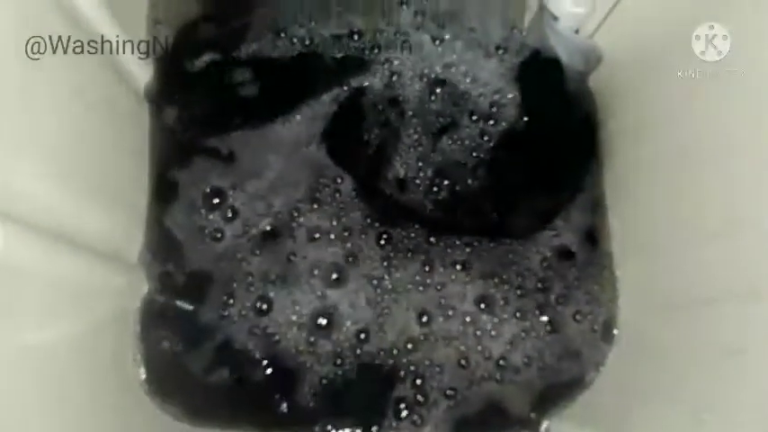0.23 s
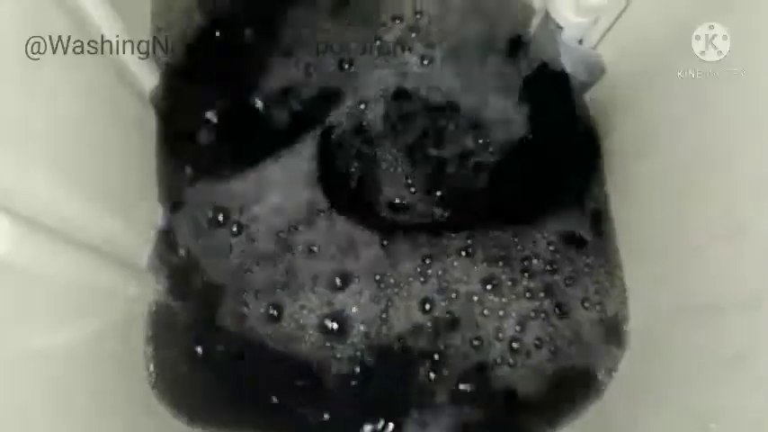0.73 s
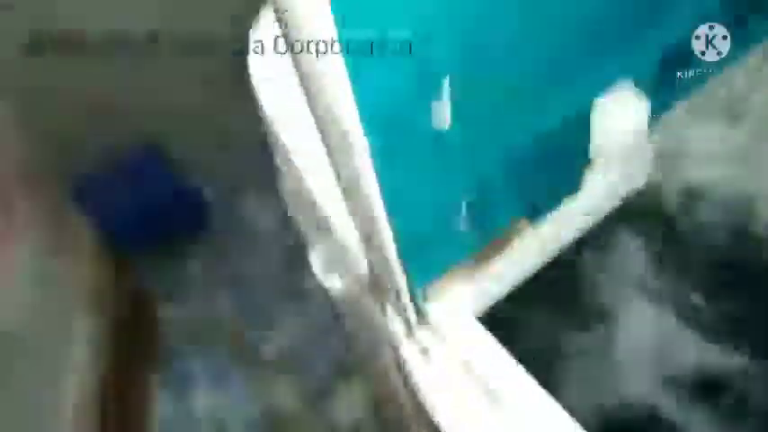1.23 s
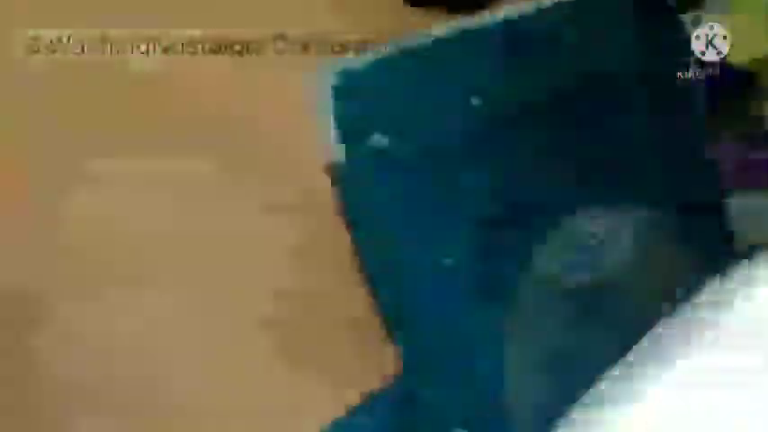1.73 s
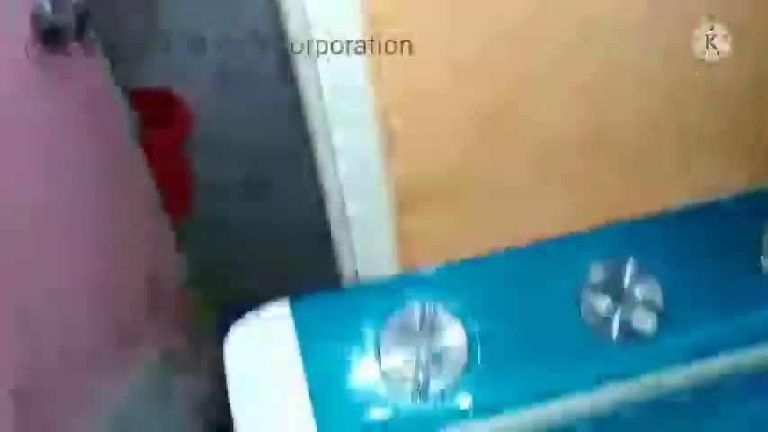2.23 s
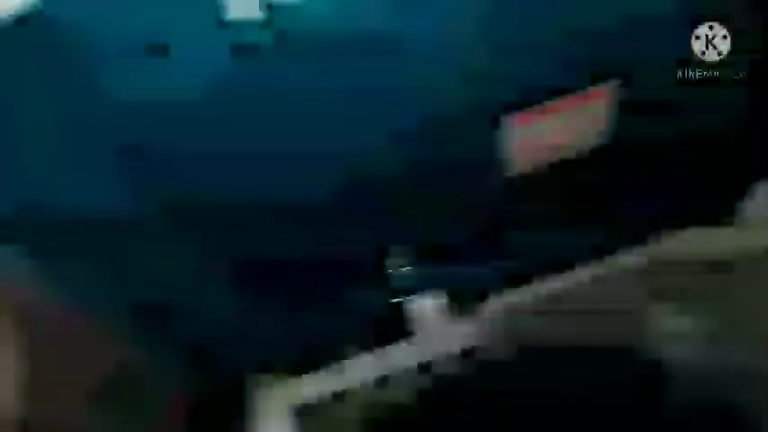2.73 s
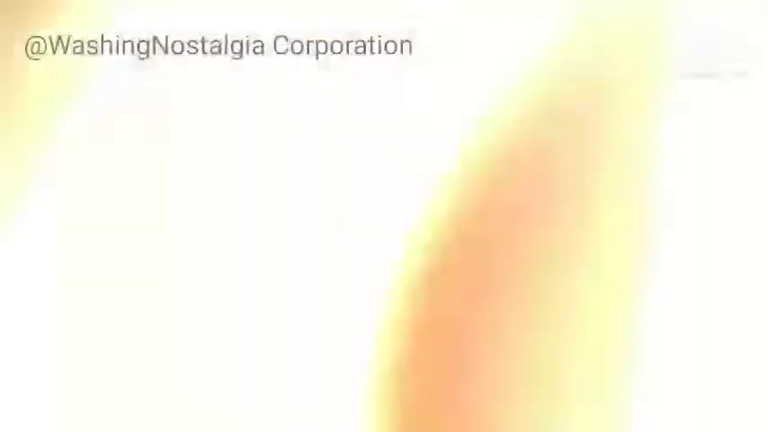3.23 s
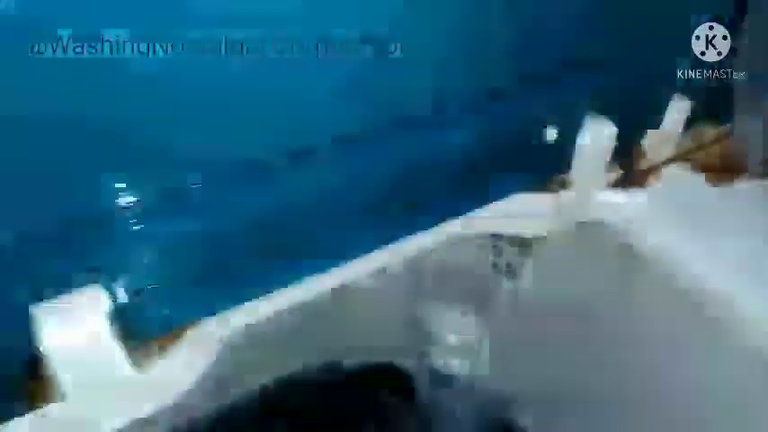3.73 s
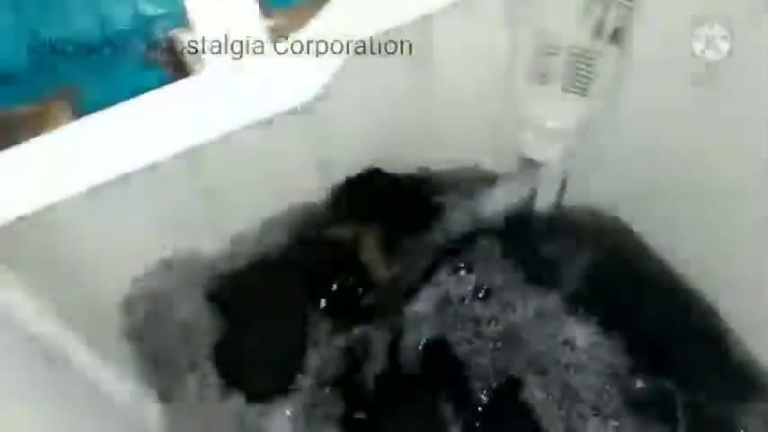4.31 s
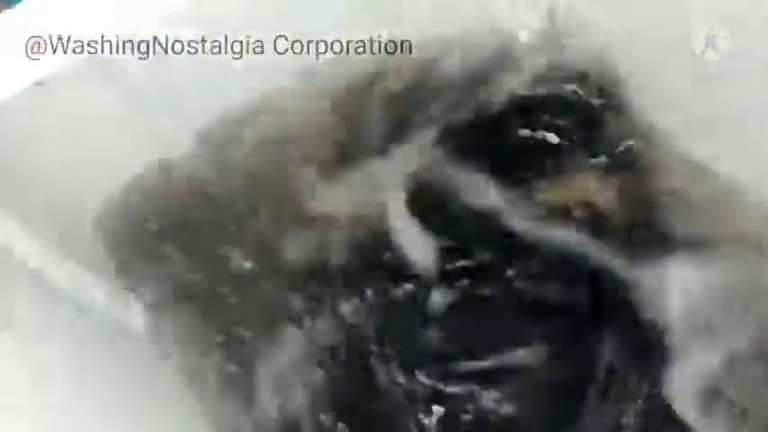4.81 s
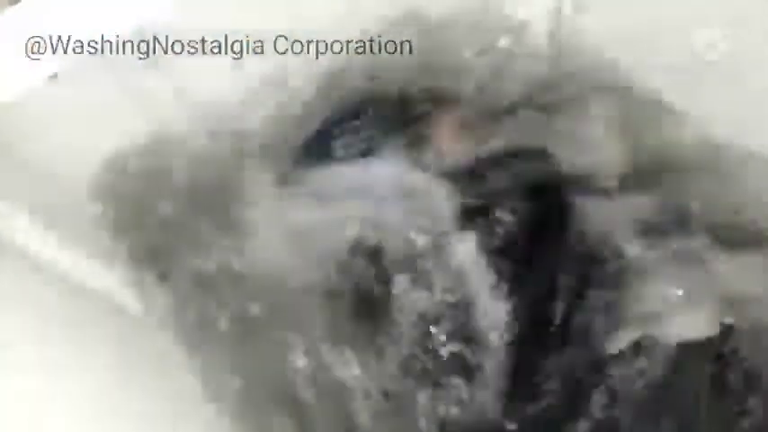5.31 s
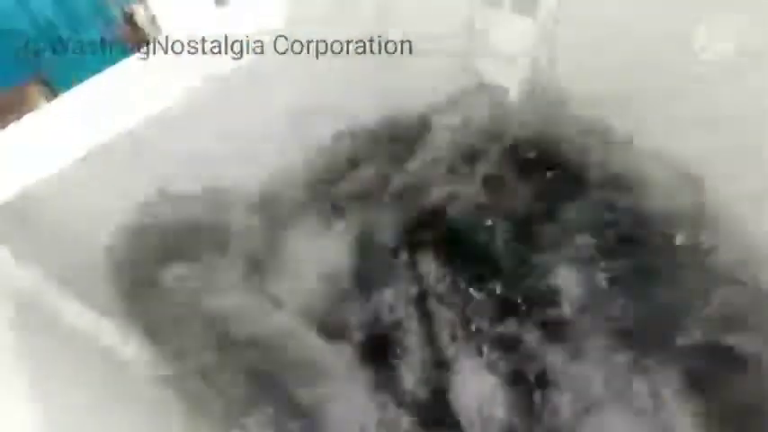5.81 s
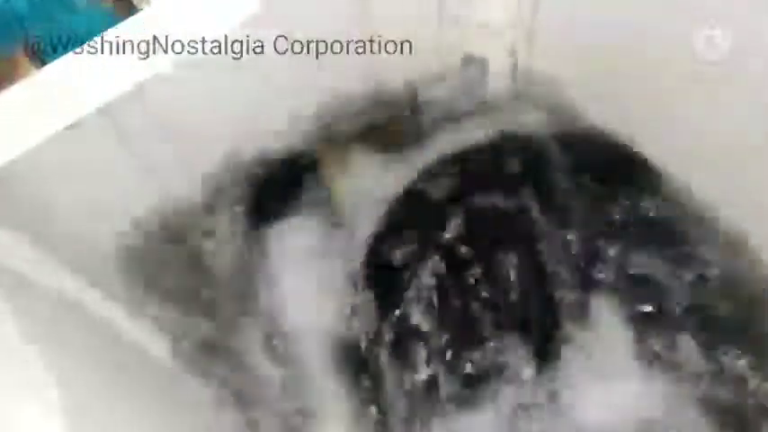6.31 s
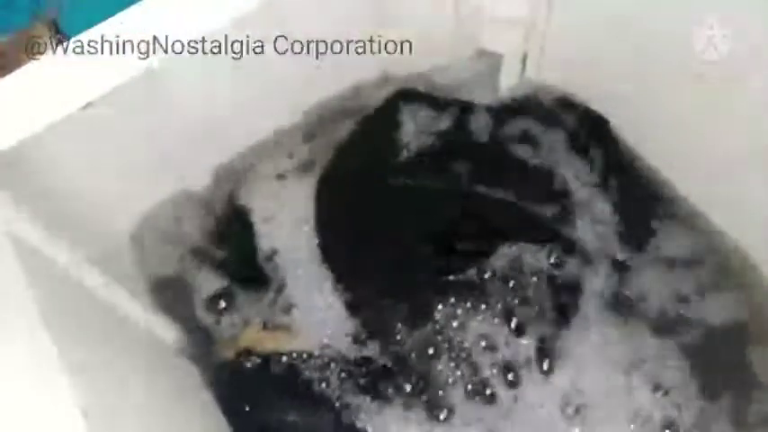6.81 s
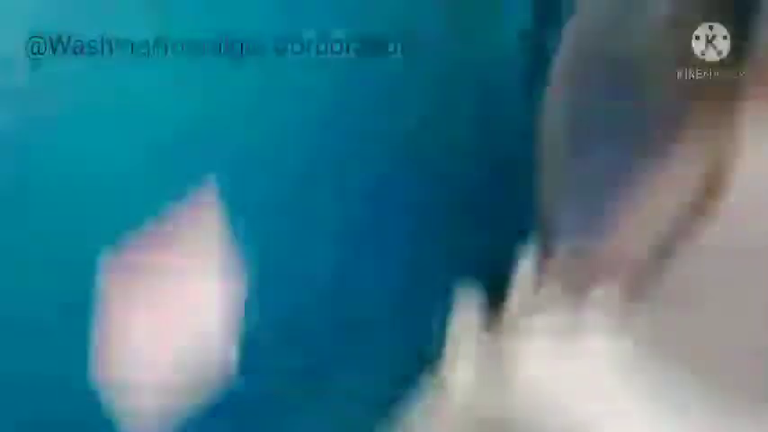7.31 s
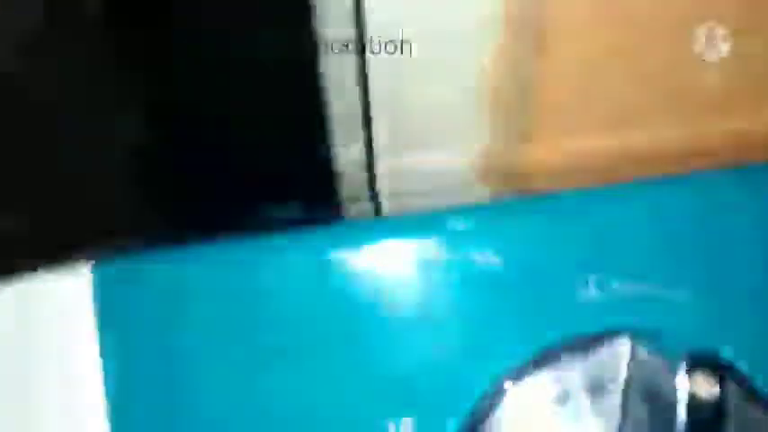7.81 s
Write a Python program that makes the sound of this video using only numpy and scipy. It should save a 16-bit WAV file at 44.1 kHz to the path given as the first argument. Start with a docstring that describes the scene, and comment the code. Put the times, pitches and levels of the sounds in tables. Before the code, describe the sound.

A washing machine twice snaps on, hums and churns sloshing water, while its clockwork timer rattles quickly throughout.

```python
"""Water churns in a twin-tub washer, twice: a flickering rush full of bubbles slaps the tub wall, then settles
into gurgles and drips. Each run opens with a switch snap and a straining motor hum over rumble and grind.
A clockwork timer rattles throughout, its escapement ringing the case. The hand-held microphone moves
around the machine in a quiet room, and fingers brush its two ports now and then."""
import sys
import numpy as np
from scipy import signal
from scipy.fft import rfft, irfft
from scipy.io import wavfile
from scipy.ndimage import uniform_filter1d

SR = 44100
rng = np.random.default_rng(int(sys.argv[2]) if len(sys.argv) > 2 else 0)


def materialize(psi):
    """Save the field psi as 16-bit PCM at rate SR to the path in sys.argv[1].

    A 1-D psi becomes a single channel; in a 2-D psi each row is a channel.
    """
    bounded = np.clip(np.atleast_2d(psi).T, -1, 1)
    quanta = np.round(bounded * 32767).astype(np.int16)
    wavfile.write(sys.argv[1], SR, quanta)


N = 355446
LAG = 6  # samples by which the left port hears the tub later
CREST = 3  # peak over rms of a noise burst

# Colour of the rushing water: (frequency [Hz], density [dB])
RUSH_SPECTRUM = [(25, -36), (59, -32), (100, -28), (160, -19.5), (283, -6.5), (322, -5.5), (398, -9),
                 (595, -17.5), (970, -8.5), (4020, -3), (7450, -14), (12900, -10.5), (16000, -15)]
# Swells of the water, one list a churn:
# (time [s], rush [dB], gurgle against rush [dB], spray against rush [dB], left-right [dB])
CHURNS = [
    [(0.79, -75, -6, -12, 1.5), (0.804, -35.5, -14, -6, 1), (0.814, -37, 1, -8, 1),
     (0.876, -34.5, -10.5, -1, 3), (0.898, -34, -7.5, -11, 1), (0.93, -32.5, -6.5, -4, 3),
     (0.944, -37.5, -1, -4, -2.5), (0.952, -36, -1.5, -9, 0), (0.958, -49, 0, 1.5, -5.5),
     (0.97, -48, -4.5, 5, -1.5), (0.978, -35, -7, -6.5, -4), (0.992, -41, 6.5, -0.5, 8),
     (1.0, -36, -21.5, -5.5, -5), (1.016, -38, -2, 0.5, 4), (1.032, -33.5, -8.5, -6.5, 0),
     (1.05, -41, 0, 5.5, 6), (1.062, -38, -7.5, 7, -2), (1.078, -43.5, -6, 2.5, 9),
     (1.088, -33, -12, -1, 0), (1.168, -45.5, 2.5, -2, 0), (1.204, -34.5, -26, -15.5, 10),
     (1.232, -36.5, -6, -2.5, 2), (1.242, -36.5, 3, -1.5, 3), (1.286, -33, -8, -6.5, -0.5),
     (1.314, -36.5, -1.5, -9, 0), (1.368, -50, -10, -3.5, 4.0), (1.386, -49.5, -6.5, -2, 1),
     (1.398, -34, -13.5, -4, 2), (1.41, -42, -6, -8.5, 9), (1.425, -37.5, -15.5, -8.5, 3),
     (1.446, -46, 1, 0, 6), (1.474, -39, -14.5, -7, 0), (1.496, -48.5, -2, -4, 2),
     (1.546, -41.5, -9.5, -4, 0.5), (1.57, -51.5, -1.5, -0.5, 5), (1.592, -48.5, -11, 0.5, -2),
     (1.634, -66, 6.5, -3, 5), (1.66, -68, 6.5, 3, 3.5)],
    [(4.37, -50, -6.5, -3.5, 0), (4.4, -65, 7, -6.5, 3), (4.41, -44.5, -13, -5.5, -4),
     (4.426, -35, -1.5, 6, 2), (4.458, -55, 5.5, -6, -1), (4.488, -32, -15, 1, 1.5),
     (4.504, -52, -2, -2.5, -3.5), (4.582, -37.5, -9, 1.5, 3), (4.592, -44.5, 2.5, -4.5, -2),
     (4.638, -42.5, -10, -4, 0), (4.654, -49, -13, -11, 6), (4.67, -45, -12, -5, 7),
     (4.7, -39, -5.5, 0.5, -2.5), (4.762, -39.5, -4, 2.5, -0.5), (4.82, -35, -7, -6.5, -2),
     (4.845, -31, -12, -8.5, -2.5), (4.882, -31.5, -9, -9, 0), (4.898, -37, -20, -6, -2),
     (4.97, -34, -4, -4, 0.5), (5.266, -35, -8.5, -4.5, -0.5), (5.286, -29.5, -27, -9.5, -2),
     (5.358, -38, -2, -4.5, -1), (5.374, -36, -3.5, 1, 1.5), (5.39, -36, -6.5, -0.5, 2),
     (5.504, -34.5, -4.5, -3.5, 0), (5.68, -37, -8, -2, 1.0), (5.7, -32.5, -3, -5.5, 0),
     (5.758, -38.5, -10.5, -3.5, -1.5), (5.794, -35, -6, -2.5, -1), (5.96, -35.5, -5, -2.5, 0.5),
     (5.996, -42.5, -18.5, 0, 0), (6.016, -37.5, -0.5, -5.5, 3), (6.042, -35, -12, -6, 0),
     (6.074, -44, -7.5, -5.5, 1), (6.11, -40, -6.5, 3.5, 6), (6.126, -35.5, -17, 6, 3),
     (6.152, -50, -16.5, 2, -4), (6.172, -48, 1, -4.5, 10), (6.182, -45, -8, -2.5, -6),
     (6.192, -42.5, -8.5, -20, 11), (6.208, -59, -1, 1, 6), (6.23, -63, -8, -1, 0)],
]


def water():
    """Churning water: a patchy rush with bubbles in the gurgle, fizz and spray above."""
    usual_gurgle_db, usual_spray_db = -10.5, -5
    hz, frame_t = grid(size=512)
    rush_db, gurgle_db, spray_db, pan_db = follow(settling_churns(), frame_t)
    drift_db = [.75 * wander(len(frame_t), span=9) for _ in range(2)]
    gurgle_db = gurgle_db - usual_gurgle_db + drift_db[0]
    spray_db = spray_db - usual_spray_db + drift_db[1]
    tilt = np.clip((1600 - hz) / 600, 0, 1) * gurgle_db + np.clip((hz - 6000) / 2000, 0, 1) * spray_db
    gusts = 1.28 * evened(uniform_filter1d(rng.exponential(1, len(frame_t)) - 1, 3))  # flurries of drops
    hollows = 3.6 * patches(size=512, bins=2, frames=8)  # brief resonances of air pockets
    mottle = 2.47 * patches(size=512, bins=14, frames=5)
    rush = gain_of(3) * noise(spectrum(RUSH_SPECTRUM, hz) + tilt + mottle + hollows + gusts, 512, .051)
    t = np.arange(N) / SR
    rush_db, gurgle_db, spray_db, pan_db = (
        np.interp(t, frame_t, curve) for curve in (rush_db, gurgle_db, spray_db, pan_db))
    gurgle = bubbles(597.8, 2318, per_s=160, cycles=15.5, spread_db=3.55, glide=.045)
    fizz = bubbles(1488, 5980, per_s=320, cycles=12, spread_db=2.5)
    spray = bubbles(4600, 19000, per_s=600, cycles=2.9, spread_db=5.5)
    mix = rush + gain_of(gurgle_db / 2 - 17) * gurgle + gain_of(-11) * fizz
    mix += gain_of(spray_db - 16.5) * spray
    gate = churning(t, fade_s=.0071)
    mid_rms = np.sqrt(np.sum(gate * band(mix.mean(0), 1200, 7000) ** 2) / np.sum(gate))
    return gate * gain_of(rush_db) * sides(pan_db) * mix / mid_rms


def settling_churns(tail_s=.43, drop_db=21):
    """Each churn with a tail in which the rush dies away."""
    return [rows + [(rows[-1][0] + tail_s, rows[-1][1] - drop_db, *rows[-1][2:])] for rows in CHURNS]


def churning(t, fade_s):
    """Gate that is open during each churn and its tail."""
    return sum(np.clip(np.minimum(t - rows[0][0], rows[-1][0] - t) / fade_s, 0, 1)
               for rows in settling_churns())


def bubbles(lo_hz, hi_hz, per_s, cycles, spread_db, glide=.013):
    """Bubbles in moving water ring as short rising tones, a few much louder than the rest."""
    out = np.zeros((2, N + 8000))
    draws = rng.random((int(per_s * N / SR), 4))
    for place, pitch, rank, side in draws[churning(draws[:, 0] * N / SR, fade_s=.01) > 0]:
        hz = lo_hz * (hi_hz / lo_hz) ** pitch
        age = np.arange(int(4 * cycles / hz * SR)) / SR * hz / cycles
        tone = np.sin(2 * np.pi * cycles * (age + glide * age ** 2))
        envelope = age ** .17 * np.exp(-2 * age)
        strength = np.sqrt(hz) * gain_of(-spread_db * np.log(rank + .02))
        add(out, place * N / SR, np.sqrt([[side], [1 - side]]) * strength * envelope * tone)
    return evened(np.array([np.roll(out[0], LAG), out[1]])[:, :N])


# Water slapping the tub wall, and small knocks in the quiet:
# (time [s], level [dB], brightness [dB], t60 [s], left-right [dB], ring [Hz])
TUB_SLAPS = [(0.7277, -29, -6, 0.079, -3.5, 600), (0.8066, -32, -10, 0.056, -6, 1500),
             (0.8989, -22.5, -7, 0.041, -5, 3530), (0.914, -21, 2, 0.026, 2, 3320),
             (0.9584, -20.5, 14, 0.012, 6, 5090), (0.9981, -32, 1, 0.044, 4, 3120),
             (1.1967, -14, -4.5, 0.04, -1.5, 2600), (1.206, -20, -4, 0.026, -6, 4240),
             (1.258, -20, -7, 0.03, 7, 2300), (1.3962, -23.5, 2, 0.056, 9, 2450),
             (1.4177, -19.5, -4, 0.061, 3, 2040), (1.4594, -36, 18, 0.15, 0, 1110),
             (1.8327, -38, -4, 0.028, 11, 1500), (1.8904, -42, -15.5, 0.08, 11, 2040),
             (1.945, -40, -20.5, 0.046, 13.5, 2160), (2.0614, -46.5, -12, 0.069, 15, 1800),
             (2.19, -55.5, -20, 0.072, 5, 1800), (3.7135, -44.5, -20, 0.061, -7, 1110),
             (3.7309, -28.5, -13.5, 0.064, -1, 1500), (4.4218, -47, 10, 0.042, -6, 1040),
             (4.4832, -26, 12, 0.019, 3, 2450), (4.5516, -36, -1, 0.034, 0, 3120),
             (4.575, -18.5, -4, 0.026, -3, 6500), (4.6503, -17.5, -7, 0.047, -7.5, 2040),
             (4.711, -23, 12, 0.035, 2, 1170), (4.8274, -16.5, -1.5, 0.034, -7, 3750),
             (4.885, -21, 1, 0.033, 0, 3320), (4.911, -20, -6, 0.03, 0, 2040),
             (4.946, -19, 9.5, 0.029, -3, 2300), (5.0894, -21, 9.5, 0.03, 0, 1330),
             (5.1294, -25, 13, 0.044, 3, 3120), (5.222, -15, -3, 0.03, -2, 2760),
             (5.285, -15, -11, 0.021, 8, 3320), (5.303, -15, -8, 0.029, 3, 5410),
             (5.3662, -27, 18, 0.038, -13, 1500), (5.415, -17, 4, 0.028, -3, 6500),
             (5.489, -32, 3, 0.03, -2, 2040), (5.536, -15, 1, 0.029, -3, 1040),
             (5.648, -25, 14, 0.032, -5, 2940), (5.69, -16.5, 0.5, 0.043, -4.5, 1500),
             (5.779, -18, -6, 0.049, 0, 2300), (5.879, -14.5, -17, 0.028, 1, 1500),
             (5.9094, -21, 17, 0.014, -4, 6500), (6.0144, -22, -18.5, 0.048, 1.5, 870),
             (6.0975, -26, 11, 0.041, -11, 920), (6.124, -31, 5, 0.025, 0, 6110),
             (6.1664, -28, -7, 0.088, -2, 920), (6.1898, -27, -6, 0.058, 0, 4240),
             (6.3634, -33, -14, 0.082, 5.5, 1040), (6.4073, -36, -11, 0.13, 1, 980),
             (6.6144, -53, -13, 0.092, 7, 2040)]


def slap(level_db, bright_db, t60, pan_db, ring_hz):
    """A short crack, then a dying spatter in three bands and the ring of an air pocket."""
    t = np.arange(int(.2 * SR)) / SR
    mid_noise, low_noise, high_noise = (ports(*pair, .15) for pair in rng.standard_normal((3, 2, t.size)))
    pocket_hz = ring_hz / 1.18, ring_hz * 1.18
    ring = gain_of(-2.5) * evened(band(band(mid_noise, *pocket_hz), *pocket_hz))
    lows = gain_of(-9.5 - .61 * bright_db) * evened(band(low_noise, 300, 2400))
    mids = gain_of(-4.5) * evened(band(mid_noise, 1500, 4900))
    highs = gain_of(min(bright_db, 12)) * evened(band(high_noise, 8500, 20000))
    lumps = gain_of(1.4 * jitter(t.size, span=100))
    crack = (1 - np.exp(-t / .00091)) * (1 + .95 * np.exp(-t / .0011))
    decay = gain_of(level_db - 60 * t / t60) / CREST
    return sides(pan_db)[:, None] * crack * decay * lumps * (ring + lows + mids + highs)


# Drips or small metal parts: (time [s], level [dB], pitch [Hz], t60 [s], left-right [dB])
DRIPS = [(1.466, -26.5, 1050, 0.021, 4), (1.609, -45, 1040, 0.06, 1), (1.659, -46.5, 1790, 0.026, 16),
         (1.712, -54, 966, 0.11, 13), (1.739, -59, 885, 0.18, 3), (1.771, -50, 3710, 0.024, 13),
         (1.832, -43, 1500, 0.022, 15), (1.893, -39.5, 1900, 0.017, 14.5), (2.546, -52, 2980, 0.041, 30),
         (2.994, -46.5, 4580, 0.03, 20), (3.599, -48.5, 2960, 0.047, 24.5), (3.791, -64, 806, 0.14, 7.5),
         (6.094, -36, 864, 0.033, 12), (6.167, -39, 965, 0.02, 27), (7.48, -41.5, 3231, 0.017, 14.5),
         (7.643, -44, 3800, 0.026, 19)]


def drip(level_db, hz, t60, pan_db):
    """One damped ping that bends up a little."""
    t = np.arange(int(.15 * SR)) / SR
    tone = np.sin(2 * np.pi * hz * (t + .5 * t ** 2)) * (1 - np.exp(-t / .0013))
    return sides(pan_db)[:, None] * gain_of(level_db - 60 * t / t60) * tone


def trickle(level_db=-62.5, t60=2.65):
    """Sliding gurgles linger after the motor stops and fade as the water comes to rest."""
    since_off = np.arange(N) / SR - np.array(MOTOR_RUNS)[:, 3:4]
    fade = np.clip(since_off / .23, 0, 1) * gain_of(level_db - 60 * np.maximum(since_off, 0) / t60)
    return fade.sum(0) * bubbles(333, 1400, per_s=110, cycles=14, spread_db=10.4, glide=.029)


# Partials of the motor hum: (pitch [Hz], level [dB], change while slack [dB], blur [Hz], waver [dB])
HUM_PARTIALS = [(199.5, 7, 1, 1.21, 2.5), (249, 1.5, -5.5, 0.17, 2), (275.7, 0.5, -2, 12, 2),
                (396, -4.5, -4.5, 6.8, 3), (606, -19.5, 1.5, 18, 2), (807, -13, -3.5, 6.7, 1),
                (1045, -16, 2, 25, 3), (1297, -24, 5.5, 40, -2)]


def hum_partials(t, waver_s=.048):
    """The motor's tones, one a row, each wavering in level and blurred in pitch."""
    partials = []
    for hz, db, _, blur_hz, waver_db in HUM_PARTIALS:
        level = gain_of(db + waver_db * wander(N, round(waver_s * SR)))
        phase = 2 * np.pi * (hz * t + rng.random()) + phase_blur(N, blur_hz)
        partials.append(level * np.sqrt(2) * np.sin(phase))
    return np.array(partials)


# Colour of the cabinet rumble: (frequency [Hz], density [dB])
RUMBLE_SPECTRUM = [(18, -65), (30, -41.5), (140, -5), (185, -24.5), (240, 4), (290, -5.5), (340, -31.5),
                   (400, 4), (500, -15.5), (1080, -21.5), (1530, -25.5), (3330, -26.5), (5200, -47),
                   (8800, -100)]
# Colour of the belt and bearings: (frequency [Hz], density [dB])
GRIND_SPECTRUM = [(200, -25.5), (500, -11), (900, 2.5), (1500, -8), (2000, -18.5), (2500, -20.5),
                  (6000, -20), (8000, -28.5), (16000, -28)]
# Motor cues: (on [s], spin-up [s], water moves [s], off [s], hum [dB], strain [dB], strain length [s],
# lowest partial while slack [dB, doubles as the strain ends], upper partials under load [dB],
# rumble [dB], grind [dB], left-right at start [dB], left-right at end [dB])
MOTOR_RUNS = [(0.478, 0.016, 0.8, 1.355, -47, 2.5, 0.11, -6, -6.5, -55, -49, 7.5, 12.5),
              (3.96, 0.058, 4.42, 5.915, -53, 7.5, 0.2, -1, 2, -53.5, -55.5, 21, 21)]


def motor(mains_hz=49, take_up_s=.02, cut_s=.025, coast_s=.047):
    """Hum, rumble and grind: the motor strains, runs slack until the water moves, and coasts once cut."""
    t = np.arange(N) / SR
    hz, _ = grid(size=1024)
    knock = 1 + .5 * np.cos(2 * np.pi * mains_hz * t)  # the rotor knocks at mains rate
    rumble_colour = spectrum(RUMBLE_SPECTRUM, hz) + 2.5 * patches(size=1024, bins=5, frames=4)
    rumble = knock * noise(rumble_colour, size=1024, likeness=.8)
    rumble *= gain_of(4 * wander(N, round(.017 * SR)))
    grind_colour = spectrum(GRIND_SPECTRUM, hz) + patches(size=1024, bins=6, frames=5)
    grind = knock * noise(grind_colour, size=1024, likeness=.21)
    partials, slack_change_db = hum_partials(t), np.array(HUM_PARTIALS)[:, 2:3]
    out = np.zeros((2, N))
    for (on, spin_up, moving, off, hum_db, strain_db, strain_s, slack_db, upper_db,
         rumble_db, grind_db, *pan_db) in MOTOR_RUNS:
        span = slice(int(on * SR), int((off + 8 * coast_s) * SR))
        now = t[span]
        cut = np.clip(1 + (off - now) / cut_s, 0, 1) ** 2
        coast = gain_of(-17) * np.exp(np.minimum(off - now, 0) / coast_s)
        power = np.clip((now - on) / spin_up, 0, 1) ** 2 * np.maximum(cut, coast)
        strain = np.exp(-((now - on) / strain_s) ** 8)
        slack = np.clip((moving - now) / take_up_s, 0, 1)
        tones = gain_of(slack_change_db * slack) * partials[:, span]
        hum = gain_of(slack_db * slack * (2 - strain)) * tones[0]
        hum += gain_of(upper_db * (1 - slack)) * tones[1:].sum(0)
        push_db = strain_db * strain
        body = gain_of(hum_db + push_db) * hum + gain_of(rumble_db + .66 * push_db) * rumble[:, span]
        body *= sides(np.interp(now, [on, off], pan_db))
        out[:, span] = power * (body + gain_of(grind_db + push_db) * grind[:, span])
    return out


# The motor switch: (time [s], level [dB], brightness [dB], t60 [s], left-right [dB], ring [Hz])
SWITCH_SNAPS = [(.4833, -28, -2, 0.085, 0.5, 5250), (3.9694, -26.5, -4.5, 0.09, 1.5, 5380)]


def switch_snap(*settings):
    """The switch snaps on: the same crack and noisy ring as a slap, pitched high."""
    return slap(*settings)


# Escape-wheel drive, a row as each gear tooth takes over:
# (time [s], swings [count], early lead [share of tooth], late lead [share of tooth])
GEAR_TEETH = [(.0095, 0, .025, .025), (.888, 25, .035, .035), (1.335, 37, .035, .035),
              (2.2258, 60, .05, .025), (3.072, 82, .06, .025), (3.9465, 105, .035, .035),
              (4.83, 128, .035, .035), (6.115, 162, .035, .035), (7.0112, 185, .027, .054),
              (7.882, 208, .027, .054), (8.78, 231, 0, 0)]


def swing_times(swings):
    """When the escapement reaches each count; swings start quick and slow down along each tooth."""
    times, counts, early, late = np.transpose(GEAR_TEETH)
    teeth = np.arange(len(times))
    place = np.interp(swings, counts, teeth)
    tooth, along = place.astype(int), place % 1
    lead = along * (1 - along) * (early[tooth] + (late - early)[tooth] * along)
    return np.interp(place - lead, teeth, times)


# Modes of the timer case: (pitch [Hz], blur [Hz], level on a tick [dB], level on a tock [dB])
CASE_MODES = [(1227, 110, -17.5, -21.5), (1725, 63, -23.5, -23.5), (2047, 29, -6, -6), (2610, 85, -13, -11),
              (2651, 52, -1.5, -3.5), (2985, 160, 2.5, -14.5), (3237, 47, 4, 1.5), (3780, 90, -9, -1.5),
              (4200, 100, -3, -7), (4980, 83, -6, -7.5), (5620, 110, -2.5, -13.5),
              (5950, 220, -19.5, -27.5), (8400, 400, -28, -24.5), (8700, 240, -13.5, -19),
              (10020, 230, -10.5, -10.5), (12000, 400, -22, -17), (13100, 630, -13, -26),
              (15000, 300, -22.5, -26.5)]
# Level ride on the tock as the microphone turns: (time [s], level [dB])
TOCK_RIDE = [(0, -0.5), (2.5, -1.5), (3.3, -1.5), (6.6, 0), (7.5, 0), (7.7, -2.5), (7.9, 3.5), (8.0, 2.5),
             (8.06, -4)]


def escapement(nearness, scatter_db=2, far_wobble=.018, port_turns=.13):
    """Each tick and tock is a blow and brief chatter that ring the case; gives five stems of modes."""
    t, delay = np.arange(800) / SR, np.array([LAG, 0])[:, None, None] / SR
    hz, blur_hz, *strength_db = np.transpose(CASE_MODES)[:, :, None]
    knob, upper, treble, top = abs(hz - 3150) < 300, abs(hz - 4050) < 400, abs(hz - 5500) < 1000, hz > 7000
    groups = [~(knob | upper | treble | top), knob, upper, treble, top]
    stems = np.zeros((5, 2, N), dtype="f4")
    tick, tock = (.007, .0045, .49, .011, .0004), (.57, .008, .1, .012, .0018)
    for is_tock, (swing_share, chatter_s, blow, ring_s, rise_s) in enumerate([tick, tock]):
        chatter = np.exp(-t / ring_s) / (1 + np.exp((t - chatter_s) / .0019))
        envelope = blow * np.exp(-t / .0038) + chatter + .04 * np.exp(-t / .014)
        envelope *= (1 - np.exp(-t / rise_s)) * np.cos(np.pi / 2 * t / t[-1])
        for at in swing_times(np.arange(214) + swing_share):
            chance = rng.standard_normal((3, len(hz), 1))
            near = nearness[min(round(at * SR), N - 1)]
            pitch = hz * (1 + far_wobble * (1 - near) * chance[2])
            # The chatter keeps upsetting the phase.
            blur = phase_blur((len(hz), t.size), blur_hz * (1 + 1.6 * (1 - near) ** 2))
            turns = pitch * (t - delay) + chance[0] + port_turns * chance[1] * (delay > 0)
            rings = np.sin((2 * np.pi * turns + blur).astype("f4"))
            ride_db = is_tock * follow([TOCK_RIDE], at)[0]
            rings *= gain_of(strength_db[is_tock] + ride_db + scatter_db * (chance[0] + .34 * chance[1:]))
            bounces = 1 + .092 * jitter(t.size, span=25)  # the pallet bounces unevenly
            damping = np.exp(-near ** 2 * t / .009)  # close up the ticks die sooner
            for stem, modes in zip(stems, groups):
                add(stem, at, (rings * modes).sum(1) * envelope * bounces * damping)
    return [evened(stem) for stem in stems]


# Perspective on the timer: (time [s], level [dB], rings below 3 kHz [dB], near 4 kHz [dB],
# at 5-6 kHz [dB], above 7 kHz [dB], left-right [dB], nearness to the knob [0-1])
TIMER_PERSPECTIVE = [(0, -64, -1, -12, 3.5, -5, -4, 0.07), (.25, -64.5, -1.5, -8, 1.5, -7, -2, 0),
                     (.45, -65, -1, -20, 6.5, -5, -2, 0), (1.9, -57, 0.5, 1, -5, -13, 2, 0.2),
                     (2.25, -65.5, -7.5, -0.5, 2, -8, 4, 0.2), (2.6, -63.5, 2, 0.5, -2, -8.5, 0.5, 0.1),
                     (3.05, -59, -3, -2, 1, -5, 2.5, 0.4), (3.3, -66, -1.5, -5, -2, -8, 7, 0.2),
                     (3.55, -60, 1, -3, -2, -8, -5, .2), (3.8, -62.5, 0, -7, -2.5, -5, -3, .1),
                     (4.1, -49, 4.5, -6, -7, -11, 7.5, 0.3), (4.35, -56.5, -3, -7, -1, 2, -3, 0.3),
                     (6.5, -63, -2.5, -3.5, -3, -8, -1, 0.1), (6.8, -64.5, 1, -4, -4, -5, -3.5, 0.2),
                     (7.1, -62.5, 1.5, -4, -3, -4.5, -3.5, 0.2), (7.45, -61.5, -2, 1.5, 0, -6.5, 1, 0.4),
                     (7.62, -49.5, -1, -2, -2, -4, 0.5, 0.6), (7.75, -47.5, -2, -3, -0.5, -5, 3, 0.96),
                     (7.92, -43, -1.5, -5.5, 0, -7, 5.5, 0.8), (8.06, -42, -4, -3.5, -11, -13, 6.5, 0.7)]


def timer():
    """The clockwork from a moving microphone: crisp at the knob, smeared by nearby panels from afar."""
    t = np.arange(N) / SR
    level_db, low_db, upper_db, treble_db, top_db, pan_db, near = follow([TIMER_PERSPECTIVE], t)
    knob_db = -10 + 22 * near  # the knob rings out only towards its front
    faders_db = low_db, knob_db, upper_db, treble_db, top_db
    direct = sum(gain_of(db) * stem for db, stem in zip(faders_db, escapement(near)))
    echoes = ports(*rng.standard_normal((2, 800)), .62) * np.exp(-t[:800] / .0062)
    smeared = signal.oaconvolve(direct, echoes / np.linalg.norm(echoes[0]), axes=1)[:, :N]
    return gain_of(level_db) * sides(pan_db) * ((.2 + .12 * near) * direct + .52 * (1 - near) * smeared)


# Low cabinet knocks, soft bumps and rustles of the grip:
# (time [s], level [dB], length [s], left-right [dB], pitch [Hz])
KNOCKS_AND_BUMPS = [(.49, -33, 0.017, -12, 260), (.535, -21.5, 0.026, 5, 233), (.572, -24.5, 0.041, 3, 390),
                    (.575, -26, 0.042, 7, 267), (.64, -28.5, 0.087, 3, 270), (.7, -21.5, 0.058, 5, 270),
                    (.785, -28, .018, 4, 85), (.946, -32, 0.02, 8, 84.5), (1.188, -37, .018, 8, 85),
                    (1.335, -36, 0.015, 4, 260), (2.966, -65, 0.04, 15, 260), (3.115, -52, .055, -4, 11000),
                    (3.483, -68, 0.023, -13, 260), (4.415, -32, .03, 5, 70), (5.765, -39, 0.024, 8.5, 70),
                    (6.8, -72, 0.041, -19.5, 260), (7.27, -58, 0.081, 18, 250),
                    (7.472, -55, 0.019, 27, 244), (7.485, -65, .055, 28.5, 250),
                    (7.633, -56.5, 0.0088, 17, 262), (7.944, -57, 0.069, 19, 267)]


def bump(level_db, length_s, pan_db, hz):
    """A soft puff of noise around one pitch."""
    narrow = band(ports(*rng.standard_normal((2, 8000)), .61), hz / 1.2, hz * 1.2)
    steady = evened(band(narrow, hz / 2, min(hz * 2, SR / 2.2)))
    puff = steady[:, 2000:2000 + int(length_s * SR)]
    return sides(pan_db)[:, None] * gain_of(level_db) / CREST * puff * np.hanning(puff.shape[1])


# Finger strokes over a port: (peak time [s], level [dB], rise [s], fall [s], brightest cutoff [Hz],
# fastest slips [1/s], left against right [dB])
FINGER_STROKES = [(2.72, -38, 0.017, 0.022, 309, 150, -48), (2.737, -18, 0.0062, .036, 745, 160, -57),
                  (2.808, -13, .022, 0.024, 2340, 940, -54), (7.262, -73, 0.0097, .012, 500, 327, 8),
                  (7.297, -58, .018, .02, 904, 1500, 9), (7.312, -60, 0.012, 0.013, 3500, 4000, 3)]


def finger_rub(light_hz=274.7, light_slips_per_s=120):
    """Skin slips over a port in jerks, faster and brighter under pressure; the port overloads softly."""
    t = np.arange(N) / SR
    at, peak_db, rise, fall, peak_hz, fastest, left_db = np.transpose(FINGER_STROKES)[:, :, None]
    from_peak = np.where(t < at, (at - t) / rise, (t - at) / fall) ** 2
    pressure = np.exp(-1.7 * from_peak)
    strokes = gain_of(peak_db - 21 * from_peak)
    slips_per_s = light_slips_per_s + ((fastest - light_slips_per_s) * pressure).sum(0)
    slips = np.cumsum(slips_per_s * np.exp(.5 * jitter(N, span=150))) / SR
    jerks = np.diff(np.floor(slips), prepend=0) * rng.uniform(-.8, 1, N) + .008 * rng.standard_normal(N)
    hz, frame_t, frames = signal.stft(jerks, SR, nperseg=256, noverlap=192)
    hz = hz[:, None]
    cutoff_hz = np.interp(frame_t, t, light_hz + ((peak_hz - light_hz) * pressure).sum(0))
    colour_db = -np.minimum(4.96 * (hz / cutoff_hz) ** 1.5, 70) - 10 * np.log10(1 + (220 / (hz + 1)) ** 8)
    boom_db = 9 * np.exp(-((hz - 350) / 130) ** 2) * np.minimum(700 / cutoff_hz, 1)  # lightly covered port
    scrape = signal.istft(frames * gain_of(colour_db + boom_db), nperseg=256, noverlap=192)[1][:N]
    scrape *= strokes.sum(0) / np.sqrt(uniform_filter1d(scrape ** 2, 800))
    balance = gain_of([left_db[strokes.argmax(0), 0], np.zeros(N)])
    return .3 * np.tanh(scrape / .3) * balance


# Colour of the room air: (frequency [Hz], density [dB])
AIR_SPECTRUM = [(18, -40), (30, -22), (115, -15.5), (384, -5), (449, -9), (1540, -11), (2060, -6),
                (3220, -.5), (5590, -8), (7090, -19), (9220, -7.5), (14400, -18), (16000, -30)]
# Level ride on the air: (time [s], below 1.5 kHz [dB], above [dB]); the highs fall away after 7.6 s
AIR_RIDE = [(0, 6, 2), (.5, 3.5, -2), (2.1, 1, 0), (2.6, 3, 1.5), (3.3, -2, 0), (3.9, 0.5, 1),
            (6.6, -2.5, -1.5), (7.1, -6, 1.5), (7.55, -2, -1), (7.68, -2, -6), (8.06, -2, -5)]
# Stereo image of the air: (frequency [Hz], likeness at the two ports [0-1])
AIR_LIKENESS = [(60, .9), (500, .75), (2000, 0.8), (8000, 0)]
# Faint steady tones in the room: (pitch [Hz], level [dB])
AIR_TONES = [(398.4, -95.5), (597.5, -94.5), (1351, -93)]


def room(level_db=-70.5):
    """Quiet air with centred lows, wide highs and a few fuzzy tones."""
    hz, frame_t = grid(size=1024)
    low_db, high_db = follow([AIR_RIDE], frame_t)
    low_share = np.clip((2000 - hz) / 1000, 0, 1)
    high_db = high_db + 2 * patches(size=1024, bins=40, frames=6)
    colour_db = spectrum(AIR_SPECTRUM, hz) + low_share * low_db + (1 - low_share) * high_db
    left, other = rfft(noise(colour_db, size=1024))
    likeness = spectrum(AIR_LIKENESS, np.fft.rfftfreq(N, 1 / SR))
    earlier = np.exp(2j * np.pi * LAG * np.fft.rfftfreq(N))
    right = likeness * left * earlier + np.sqrt(1 - likeness ** 2) * other
    air = gain_of(level_db) * irfft([left, right], N)
    for tone_hz, db in AIR_TONES:
        drift = .012 * np.cumsum(rng.standard_normal(N))
        air += gain_of(db) * np.sqrt(2) * np.sin(2 * np.pi * tone_hz * np.arange(N) / SR + drift)
    return air


def gain_of(db):
    return 10 ** (np.asarray(db) / 20)


def evened(x):
    """Scales to rms 1."""
    return x / np.sqrt(np.mean(x ** 2) + 1e-20)


def spectrum(points, hz):
    """Reads a curve on a log-frequency axis."""
    point_hz, value = np.transpose(points)
    return np.interp(np.log(hz + 1), np.log(point_hz + 1), value)


def follow(tables, t):
    """Joins the rows of all tables into curves at times t."""
    times, *columns = np.transpose([row for table in tables for row in table])
    return [np.interp(t, times, column) for column in columns]


def sides(pan_db):
    """Left and right gains, pan_db apart."""
    return gain_of(np.array([pan_db, -pan_db]) / 2)


def ports(shared, other, likeness):
    """One sound at two ports: partly alike, the left a little late."""
    return np.array([np.roll(shared, LAG), likeness * shared + np.sqrt(1 - likeness ** 2) * other])


def add(mix, start_s, sound):
    part = mix[..., round(start_s * SR):][..., :sound.shape[-1]]
    part += sound[..., :part.shape[-1]]


def band(x, lo_hz, hi_hz):
    return signal.sosfilt(signal.butter(2, [lo_hz, hi_hz], "bandpass", fs=SR, output="sos"), x)


def grid(size):
    """Bin frequencies and frame times for a window of this size."""
    return np.fft.rfftfreq(size, 1 / SR)[:, None], np.arange(N * 4 // size + 5) * size / 4 / SR


def noise(field_db, size, likeness=0.):
    """Stereo noise of rms 1, coloured by a field over (bins, frames)."""
    real, imag = rng.standard_normal((N * 4 // size + 5, size // 2 + 1, 2, 2), dtype="f4").T
    frames = (real + 1j * imag) * gain_of(field_db).astype("f4")
    pair = signal.istft(frames, nperseg=size, noverlap=size * 3 // 4)[1][:, :N]
    return evened(ports(*pair, likeness))


def patches(size, bins, frames):
    """Smooth random field of rms 1."""
    field = rng.standard_normal((N * 4 // size + 5, size // 2 + 1)).T
    return evened(uniform_filter1d(uniform_filter1d(field, bins, 0), frames, 1))


def jitter(count, span):
    """Rough random curve of rms 1, averaged over span steps."""
    return evened(uniform_filter1d(rng.standard_normal(count), span))


def wander(count, span):
    """Smooth random curve of rms 1."""
    return evened(uniform_filter1d(jitter(count, span), span))


def phase_blur(shape, width_hz):
    """Random walk of phase that widens a tone."""
    return np.cumsum(rng.standard_normal(shape, dtype="f4"), -1) * np.sqrt(2 * np.pi * width_hz / SR)


def scene():
    """The washer and the handling noise over the quiet room."""
    mix = timer() + motor() + water() + trickle() + finger_rub() + room()
    hits = [(TUB_SLAPS, slap), (SWITCH_SNAPS, switch_snap), (DRIPS, drip), (KNOCKS_AND_BUMPS, bump)]
    for cues, sound in hits:
        for at, *settings in cues:
            add(mix, at, sound(*settings))
    return mix


def record(dry, edge_hz=15800):
    """Small microphones lose the bass; the left one is duller on top; then the band limit."""
    thin = signal.sosfilt(signal.butter(4, 150, "highpass", fs=SR, output="sos"), dry) + .19 * dry
    top = signal.sosfilt(signal.butter(2, 7000, "highpass", fs=SR, output="sos"), thin)
    band_limit = signal.firwin(511, edge_hz, window=("kaiser", 9), fs=SR)
    return signal.oaconvolve(thin + [[-.15], [.15]] * top, band_limit[None], "same")


dry = scene()
out = record(dry)
materialize(out)
```